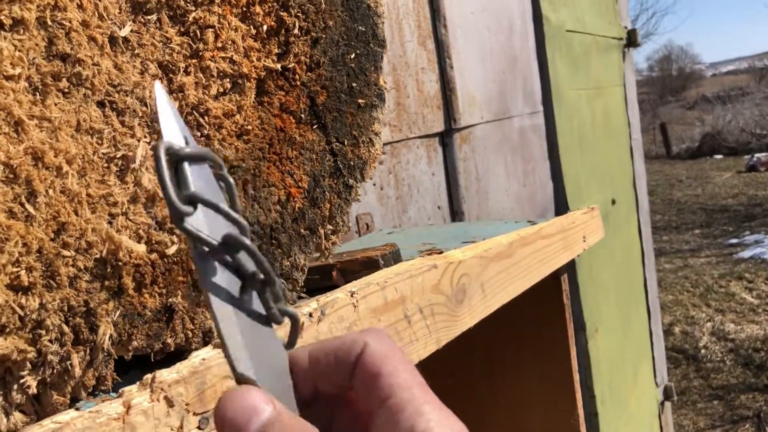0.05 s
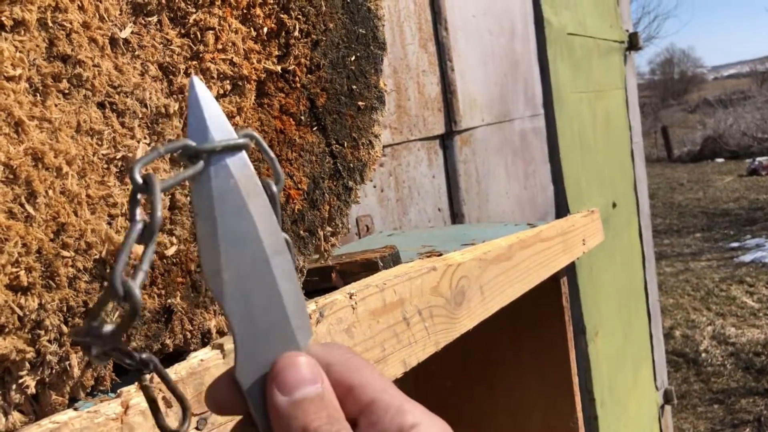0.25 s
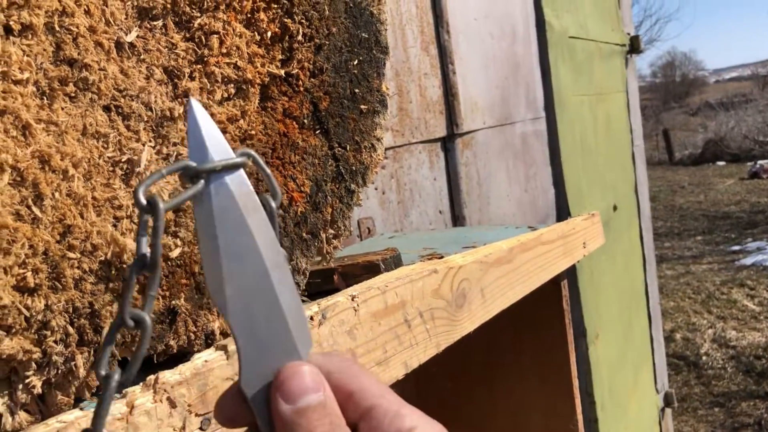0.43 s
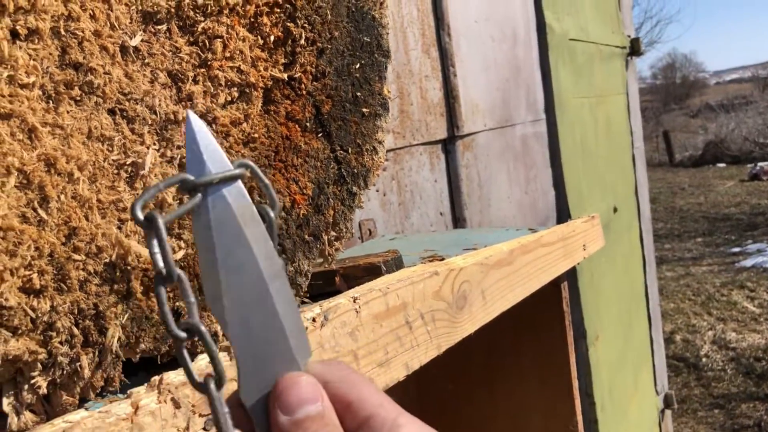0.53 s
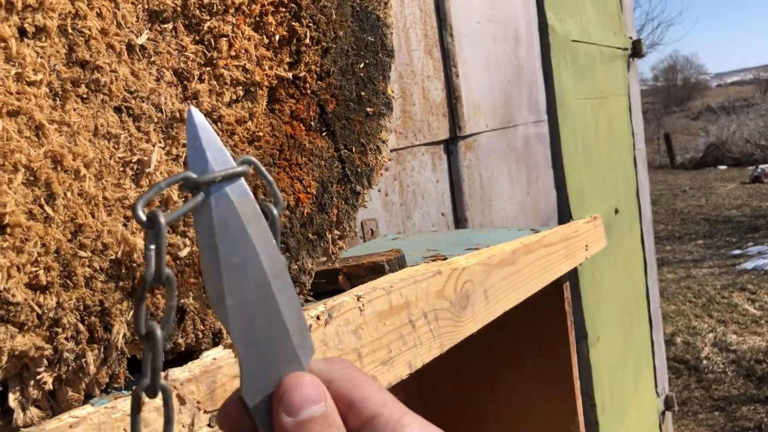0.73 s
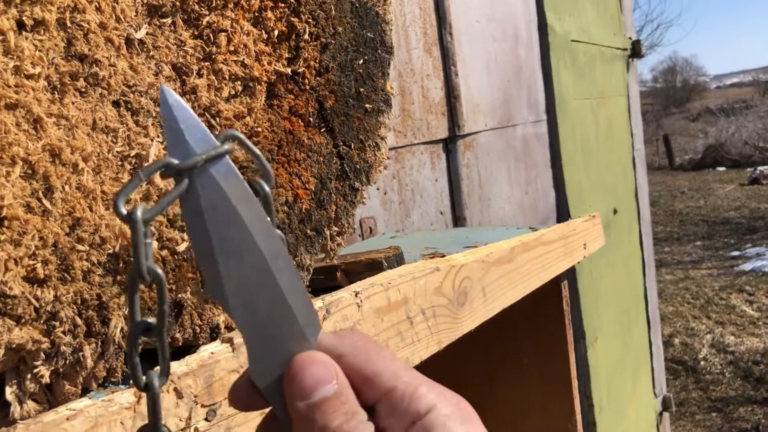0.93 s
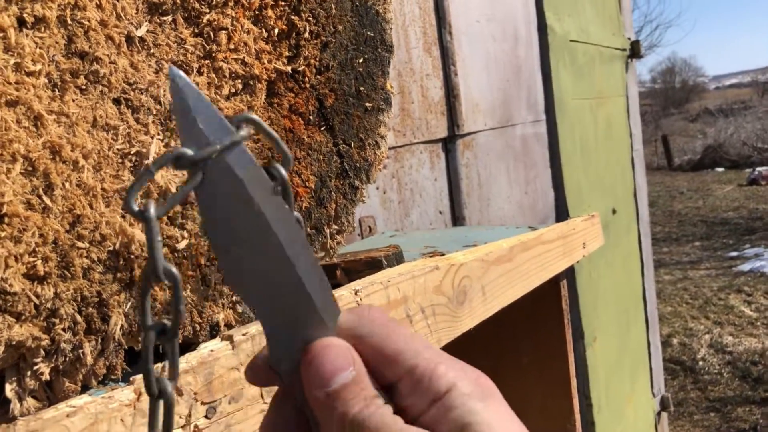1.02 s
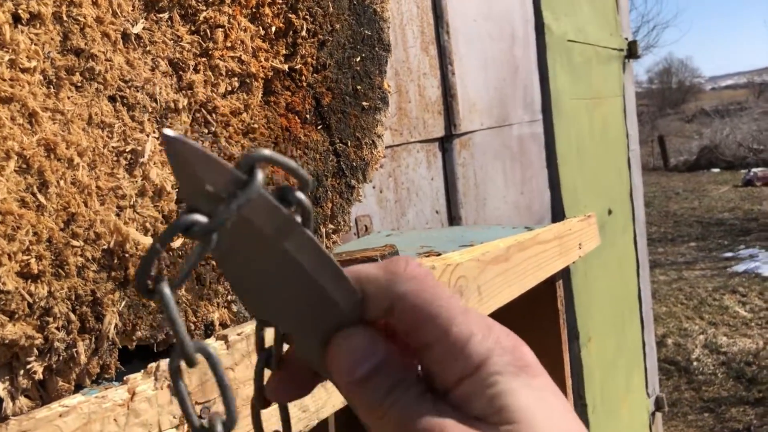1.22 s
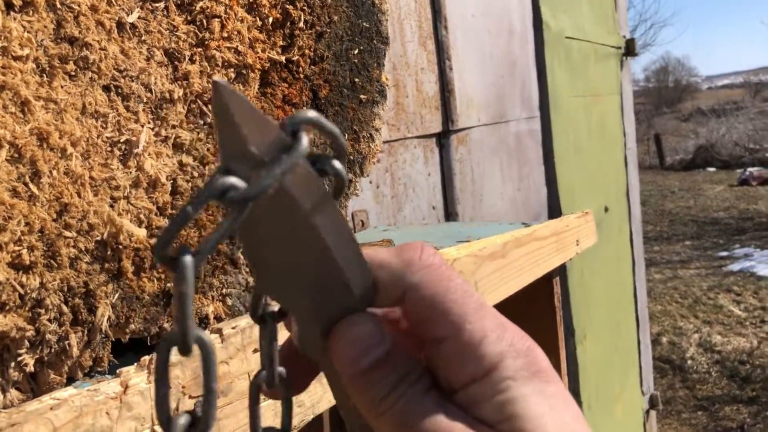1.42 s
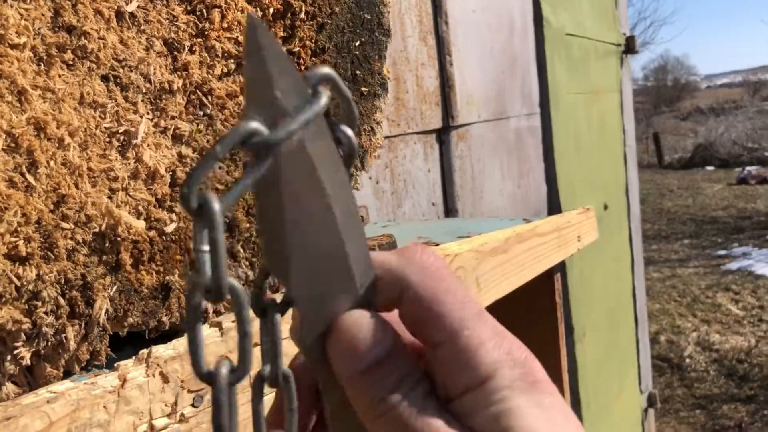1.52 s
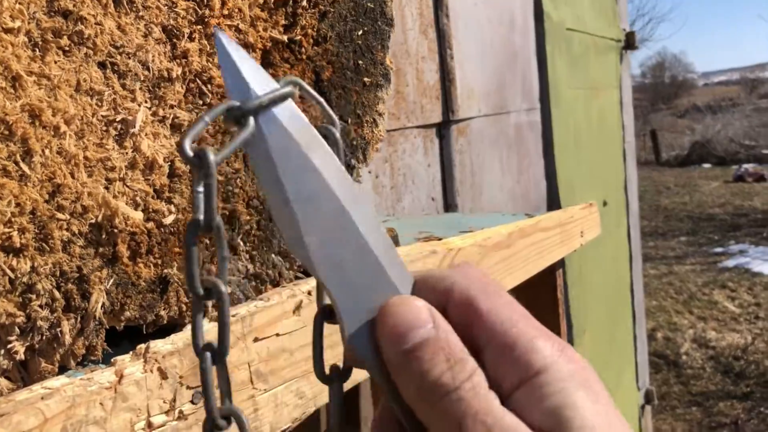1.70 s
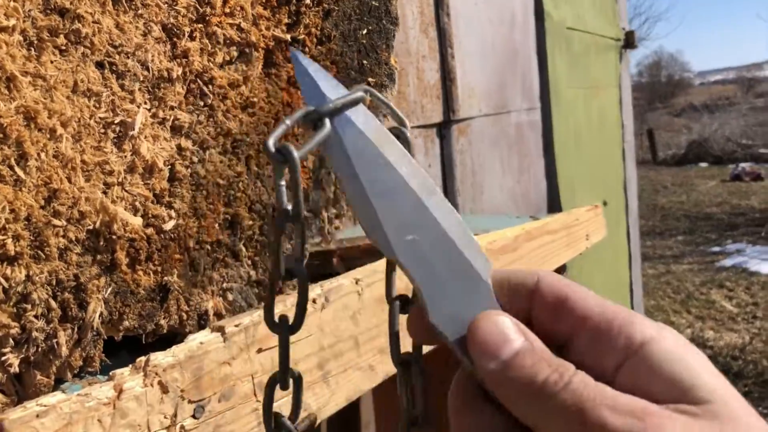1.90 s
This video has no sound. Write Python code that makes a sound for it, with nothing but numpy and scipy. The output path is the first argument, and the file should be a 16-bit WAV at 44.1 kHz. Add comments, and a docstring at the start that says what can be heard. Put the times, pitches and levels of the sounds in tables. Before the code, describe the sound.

Close metal chain links clink, tick and slide on a knife blade in faint wind.

```python
"""Outdoors by a wooden wall, a steel chain hangs over a knife blade that is tilted about, up close.
Two links knock together and ring briefly; the chain ticks against the blade, scrapes along it
and slips down it in tiny taps. Slack links ring on faintly, and the wall gives a faint echo.
Light wind, a far hum and a distant bird lie behind."""
import sys
import numpy as np
from scipy import signal
from scipy.fft import rfft, irfft
from scipy.io import wavfile
from scipy.ndimage import uniform_filter1d

SR = 44100
rng = np.random.default_rng(int(sys.argv[2]) if len(sys.argv) > 2 else 0)


def persist_wave(psi):
    """Save psi, clipped to +-1, as 16-bit WAV."""
    counts = np.round(np.clip(psi, -1, 1) * 32767).astype(np.int16)
    wavfile.write(sys.argv[1], SR, np.atleast_2d(counts).T)


N = 85995

# tone colour of the still air (f/Hz, level/dB)
AIR_COLOUR = [(25, -7.5), (80, 3.5), (400, 0), (1250, -11.5), (1850, -9.5), (2500, -14.5), (3400, -12),
              (4500, -18.5), (15500, -28)]
# strength of the wind on the microphone (t/s, level/dB)
WIND_CURVE = [(0, -73), (.24, -58), (.55, -70), (.8, -67), (1.2, -68.5), (1.42, -63), (1.8, -63),
              (1.95, -56)]
# noise bands of the far hum (f/Hz, width/Hz, level/dB)
HUM_BANDS = [(451, 75.5, 11), (625.6, 30, 1)]
# strength of the hum (t/s, level/dB)
HUM_CURVE = [(0, -84.5), (.5, -56), (.77, -55.5), (.9, -61), (1.02, -51), (1.17, -73.5), (1.3, -52),
             (1.5, -61.5), (1.73, -51), (1.83, -70)]
# bird whistles (t/s, length/s, first f/Hz, last f/Hz, level/dB, warble as a share of the pitch)
BIRD_NOTES = [(0.726, 0.066, 4310, 4050, -60.5, 0.0063), (0.85, 0.13, 3564, 3215, -60, 0.0506)]
# ringing tones of two slack links (f/Hz, level/dB)
NEAR_LINK_TONES = [(7397, 1), (8760, -3.5), (15150, 1.5)]
FAR_LINK_TONES = [(10627, -1), (11200, -5), (11850, -3.5)]
# jolts to the slack links (t/s, near link level/dB, far link level/dB)
SLACK_JOLTS = [(0.5971, -62, -84.5), (.8327, -73, -94.5), (1.2189, -86.5, -74), (1.6999, -90, -62)]
# ringing tones of the blade and the two knocking links (f/Hz, level/dB, time to fade by 60 dB/s)
BLADE_TONES = [(3190, -5, 0.031), (3580, -3, 0.042), (5570, -3, 0.03), (6600, -4.5, 0.025),
               (6870, -3, 0.018), (8850, -9, 0.047)]
HANGING_TONES = [(1835, -30, 0.083), (3285, -22, 0.085), (3440, -12.5, 0.061), (3626, -23, 0.092),
                 (7070, -11.5, 0.021), (9544, 1, .016), (10220, -0.5, 0.008), (12260, 0, 0.02),
                 (12780, -5.5, 0.018), (14250, -1.5, 0.025), (15100, -6, .013)]
MIDDLE_TONES = [(1883, -27.5, 0.12), (3330, -10.5, 0.046), (3507, -5, .045), (3723, -8, 0.037),
                (5450, -7.5, 0.025), (7524, -1, 0.031), (9480, -12, 0.012), (13100, 0.5, 0.018),
                (13870, -2.5, 0.016)]
# the middle link struck at another spot (f/Hz, level/dB, time to fade by 60 dB/s)
MIDDLE_OTHER_CONTACT_TONES = [(1872, -27, 0.048), (3600, -11, 0.02), (5325, -8, 0.012), (5603, -3, 0.039),
                              (7626, 1, 0.023), (7760, -15.5, 0.023), (10290, -1, 0.02),
                              (13540, -6.5, 0.03), (14230, -12.5, .03)]
# tone colour of a tick, and of steel cracking or rubbing on steel (f/Hz, level/dB)
CLICK_COLOUR = [(500, -46), (2000, -18.5), (6000, -7), (10000, -3.5), (15500, 3)]
CONTACT_COLOUR = [(200, -13), (2200, -8.5), (3600, 0.5), (7000, -3), (11000, -7), (16000, -1.5)]
# the chain sliding (t/s, length/s, place of the peak 0-1, level/dB, treble tilt/dB per octave)
CHAIN_SCRAPES = [(0.039, 0.034, 0.63, -42, -9.5), (0.155, 0.14, 0.85, -48, 8), (0.262, 0.16, 0.32, -53, -2),
                 (0.395, 0.055, 0.58, -50, 0.5), (0.441, 0.17, 0.39, -50.5, -0.5),
                 (0.987, 0.068, 0.47, -53.5, -2.5), (1.046, 0.14, 0.65, -53, 3.5),
                 (1.263, 0.033, 0.55, -52, -3), (1.334, 0.0087, 0.61, -49, -9),
                 (1.561, 0.063, 0.3, -42, -0.5), (1.662, 0.082, 0.43, -50, -4.5),
                 (1.848, .11, 0.24, -55, 3)]
# a link tapping the blade (t/s, click level/dB, blade level/dB)
BLADE_TICKS = [(0.1132, -49, -45.5), (0.2761, -39, -50), (0.302, -28, -33), (0.312, -36, -60),
               (0.337, -49, -41), (0.3516, -33.5, -38.5), (0.373, -30.5, -52), (.4040, -37.5, -41.5),
               (0.4508, -30.5, -53), (0.4882, -33, -63), (0.5159, -26.5, -45.5), (0.5604, -29.5, -47),
               (0.6176, -41, -47), (.677, -47, -48), (0.8322, -50.5, -54.5), (1.023, -47, -56),
               (1.201, -48, -46.5), (1.268, -45.5, -52), (1.4412, -53, -48), (1.6999, -39.5, -41.5),
               (1.8204, -44, -49), (1.855, -50, -57)]
# links colliding (t/s, hanging link level/dB, middle link level/dB,
# middle link at its other spot level/dB, crack level/dB, fade time factor)
LINK_KNOCKS = [(0.047, -84, -79, -41, -37, 1.1), (.1595, -70, -62, -49.5, -44, 0.71),
               (0.179, -79, -50.5, -48.5, -44.5, 2.7), (0.2226, -10.5, -42, -30, -22, 0.88),
               (.2381, -30, -31, -50, -43, 1.6), (.2474, -25, -34, -54, -33, 1.35),
               (0.254, -30.5, -32.5, -65, -33, 1.5), (0.302, -47, -43, -61, -47, 2.3),
               (.3230, -45, -32, -49, -33, 0.72), (0.5886, -17.5, -17, -30.5, -11, 0.8),
               (.5974, -39, -20.5, -49, -30, 0.92), (0.6302, -60, -44, -75.5, -41, 2.2),
               (1.143, -77, -50, -45, -38.5, 1.9), (1.2117, -56, -45, -34.5, -34, 0.67),
               (1.219, -31.5, -48, -28.5, -40, 0.62), (1.3724, -57, -54, -18, -30, 0.75),
               (1.3794, -36.5, -27.5, -8, -16.5, 0.4), (1.5912, -31, -28, -27.5, -32, 0.61),
               (1.6272, -29, -27, -33, -19.5, 0.66), (1.6374, -35, -43, -42, -32, 1.28),
               (1.658, -26.5, -55, -30, -16.5, 0.6)]

# a T60 is the time a sound takes to fade by 60 dB
BIRD_T60_S, SLACK_T60_S = 0.15, 0.33
SNAP_T60_S, FIZZ_T60_S, CRACK_T60_S = 0.003, 0.024, 0.016
ECHO_DB, ECHO_T60_S, ECHO_DELAY_S = -20, 0.039, 0.0013
CONTACT_S = 0.0004  # how quickly a hit builds up


def undb(db):
    """Turn decibels into a gain."""
    return 10 ** (np.asarray(db) / 20)


def unit(x):
    """Scale a signal to a standard strength (spread 1)."""
    return x / (np.std(x) + 1e-12)


def add(out, start, x):
    """Mix x into out, beginning at start seconds."""
    i = max(int(start * SR), 0)
    out[i:i + len(x)] += x[:max(len(out) - i, 0)]


def colour(x, points, tilt_db=0, tilt_from_hz=1500):
    """Give x a tone colour at standard strength, tilting the treble by tilt_db per octave."""
    octave = np.log2(np.fft.rfftfreq(len(x), 1 / SR) + 1)
    hz, db = np.array(points, float).T
    shape_db = np.interp(octave, np.log2(hz), db)
    shape_db += tilt_db * np.maximum(octave - np.log2(tilt_from_hz), 0)
    return unit(irfft(rfft(x) * undb(shape_db), len(x)))


def band(hz, width):
    """Noise gathered around one pitch."""
    f = np.fft.rfftfreq(N, 1 / SR) + 1
    off_pitch = (f - hz * hz / f) / (2 * width)
    return unit(irfft(rfft(rng.standard_normal(N)) / (1 + 2 * off_pitch ** 2), N))


def drift(per_s):
    """Smooth wandering between random values, per_s of them a second."""
    step = int(SR / per_s)
    return unit(uniform_filter1d(rng.standard_normal(512)[np.arange(N) // step % 512], step))


def fade(t, t60):
    """Die away by 60 dB every t60 seconds."""
    return np.exp(-np.log(1000) * t / t60)


def ring(t, tones, stretch=1):
    """Struck steel: fading tones whose pitch and strength vary a little with where it is hit."""
    out = np.zeros(len(t))
    for hz, db, t60 in tones:
        db += 2 * rng.standard_normal()
        hz *= 1 + 0.0025 * rng.standard_normal()
        out += undb(db) * fade(t, t60 * stretch) * np.sin(2 * np.pi * hz * t)
    return out


def air_and_wind():
    """Still air gives a steady hush; soft gusts rumble on the microphone."""
    air = undb(-58) * colour(rng.standard_normal(N), AIR_COLOUR)
    wind_db = np.interp(np.arange(N) / SR, *np.array(WIND_CURVE).T) + 3.5 * drift(per_s=7.62)
    return air + undb(wind_db) * band(hz=78, width=80)


def far_hum():
    """A far hum swells and sinks."""
    hum = unit(sum(undb(db) * band(hz, width) for hz, width, db in HUM_BANDS))
    return hum * undb(np.interp(np.arange(N) / SR, *np.array(HUM_CURVE).T))


def bird():
    """Two faint falling whistles, smeared by the distance."""
    out, t = np.zeros(N), np.arange(16384) / SR
    for start, length, from_hz, to_hz, db, warble in BIRD_NOTES:
        progress = np.linspace(0, 1, int(length * SR))
        hz = from_hz + (to_hz - from_hz) * progress
        hz *= 1 + warble * drift(per_s=248)[:len(hz)]
        swell = np.sin(np.pi * np.sqrt(progress))
        add(out, start, undb(db) * swell * np.sin(2 * np.pi * np.cumsum(hz) / SR))
    smear = rng.standard_normal(len(t)) * fade(t, BIRD_T60_S)
    return signal.fftconvolve(out, smear / np.linalg.norm(smear))[:N]


def wall_echo(x):
    """The wooden wall and the ground throw a little sound back."""
    t = np.arange(16384) / SR
    tail = rng.standard_normal(len(t)) * fade(t, ECHO_T60_S) * (t > ECHO_DELAY_S)
    return undb(ECHO_DB) * signal.fftconvolve(x, tail / np.linalg.norm(tail))[:N]


def slack_links():
    """Jolted links that hang free keep up a thin ring that wavers as they swing."""
    out, t = np.zeros(N), np.arange(N) / SR
    for start, near_db, far_db in SLACK_JOLTS:
        for tones, level_db in ((NEAR_LINK_TONES, near_db), (FAR_LINK_TONES, far_db)):
            sway_db = 4 * drift(per_s=25)
            link = ring(t, [(hz, db, SLACK_T60_S) for hz, db in tones])
            add(out, start, undb(level_db + sway_db) * link)
    return out


def slips(from_s=1, to_s=1.57, per_s=63):
    """The chain slips down the tilting blade in tiny taps that die quickly."""
    out, t = np.zeros(N), np.arange(1024) / SR
    span = to_s - from_s
    for when, softness in rng.random((int(per_s * span), 2)):
        tap = ring(t, BLADE_TONES, stretch=0.31)
        add(out, from_s + when * span, undb(-47.5 - 9 * softness) * tap)
    return out


def scrapes(catches_per_s=820):
    """Sliding steel catches and rubs; we hear both the bare friction and the links it sets ringing."""
    out, t = np.zeros(N), np.arange(8192) / SR
    for start, length, peak, db, tilt_db in CHAIN_SCRAPES:
        catches = (rng.random(len(t)) < catches_per_s / SR) * rng.standard_normal(len(t))
        catches *= undb(rng.exponential(size=len(t)))  # a few catch harder
        friction = unit(catches) + 0.4 * rng.standard_normal(len(t))
        links = ring(t[:2048], MIDDLE_TONES + MIDDLE_OTHER_CONTACT_TONES + HANGING_TONES)
        ringing = signal.fftconvolve(friction, links)[:len(t)]
        scrape = colour(unit(friction) + unit(ringing), CONTACT_COLOUR, tilt_db)
        swell = np.interp(t / length, [0, peak, 1], [0, 1, 0])
        add(out, start, undb(db) * swell * scrape)
    return out


def ticks():
    """A link taps the blade: a bright snap, a short fizz and the blade's ring."""
    out, t = np.zeros(N), np.arange(4096) / SR
    attack = 1 - np.exp(-t / CONTACT_S)
    snap_and_fizz = undb(10) * fade(t, SNAP_T60_S) + fade(t, FIZZ_T60_S)
    for start, click_db, blade_db in BLADE_TICKS:
        click = snap_and_fizz * colour(rng.standard_normal(len(t)), CLICK_COLOUR)
        pitch_shift = 1 + 0.02 * rng.standard_normal()  # depends on where the chain rests
        blade = ring(t * pitch_shift, BLADE_TONES)
        add(out, start, attack * (undb(click_db) * click + undb(blade_db) * blade))
    return out


def knocks():
    """Two links knock with a crack and ring; the middle link's ring depends on where it is struck."""
    out, t = np.zeros(N), np.arange(4096) / SR
    attack = 1 - np.exp(-t / CONTACT_S)
    for start, hanging_db, middle_db, other_contact_db, crack_db, stretch in LINK_KNOCKS:
        links = undb(hanging_db) * ring(t, HANGING_TONES, stretch)
        links += undb(middle_db) * ring(t, MIDDLE_TONES, stretch)
        links += undb(other_contact_db) * ring(t, MIDDLE_OTHER_CONTACT_TONES, stretch)
        crack = fade(t, CRACK_T60_S * stretch) * colour(rng.standard_normal(len(t)), CONTACT_COLOUR)
        add(out, start, attack * (links + undb(crack_db) * crack))
    return out


def scene():
    """The chain close by, the outdoors behind."""
    low_cut = signal.butter(2, 1000, "high", fs=SR, output="sos")  # small links give off little bass
    steel = signal.sosfilt(low_cut, knocks() + ticks() + scrapes() + slips() + slack_links())
    return (steel + wall_echo(steel) + air_and_wind() + far_hum() + bird())[None]


def record(dry):
    """The recorder cuts the treble above 16100 Hz."""
    return signal.sosfilt(signal.ellip(8, 0.2, 70, 16100, fs=SR, output="sos"), dry)


dry = scene()
out = record(dry)
persist_wave(out)
```